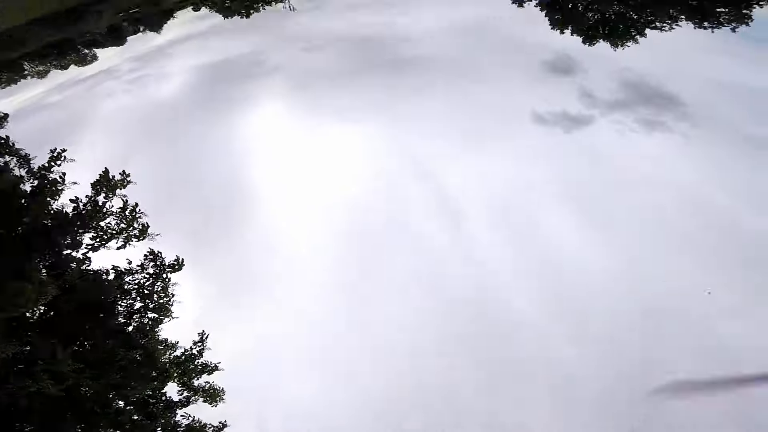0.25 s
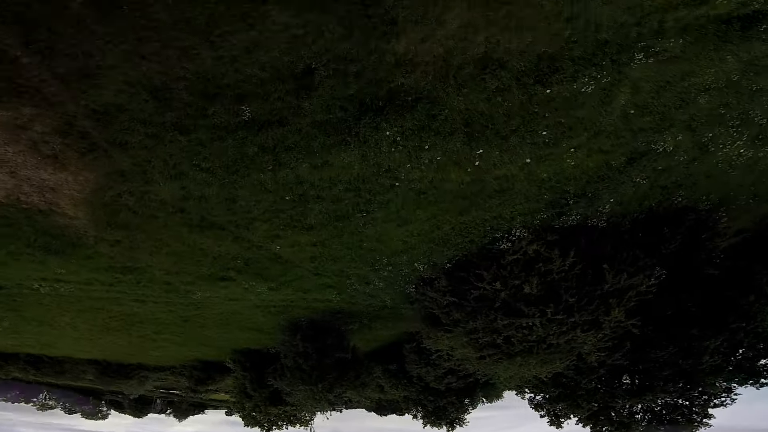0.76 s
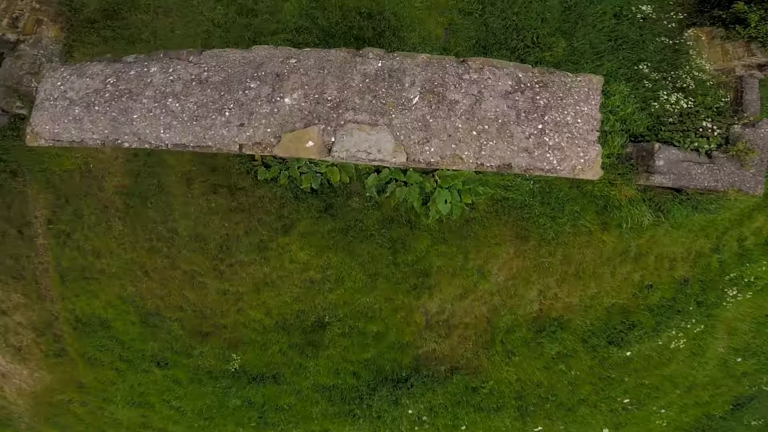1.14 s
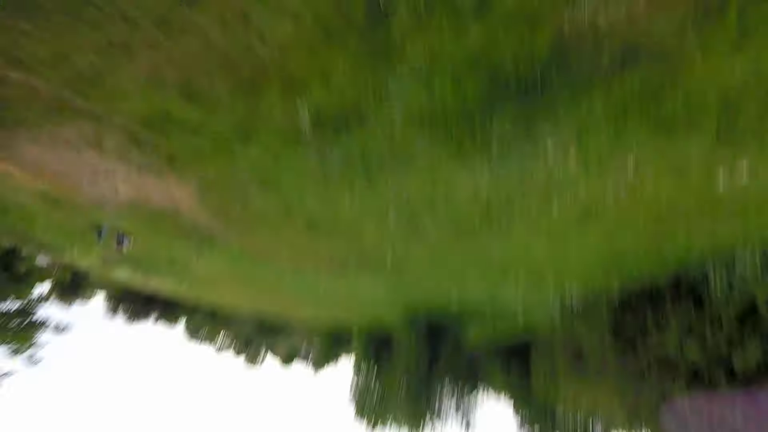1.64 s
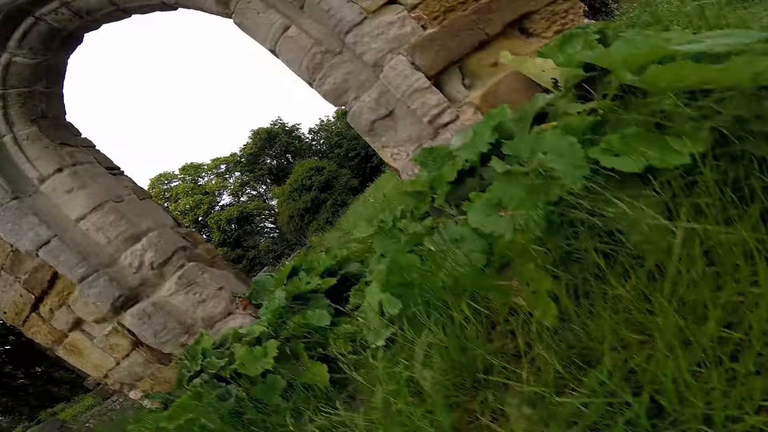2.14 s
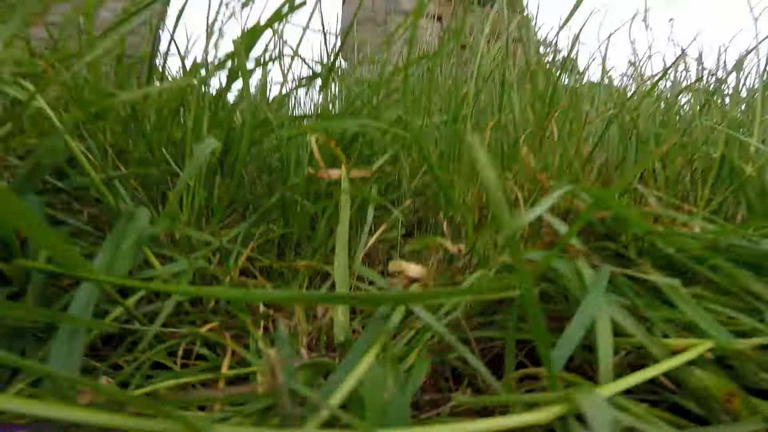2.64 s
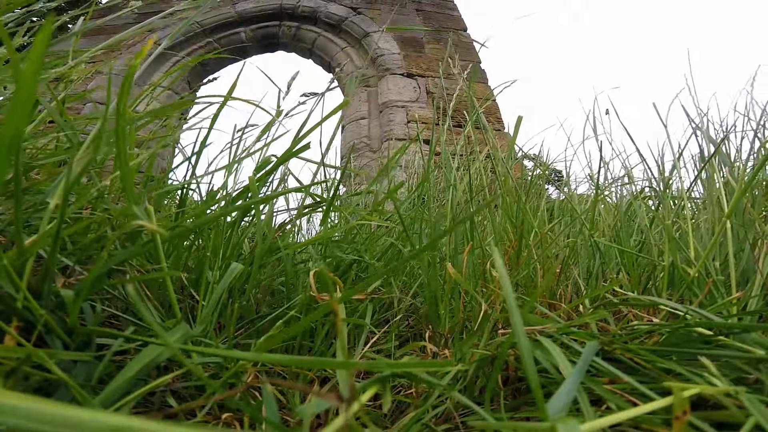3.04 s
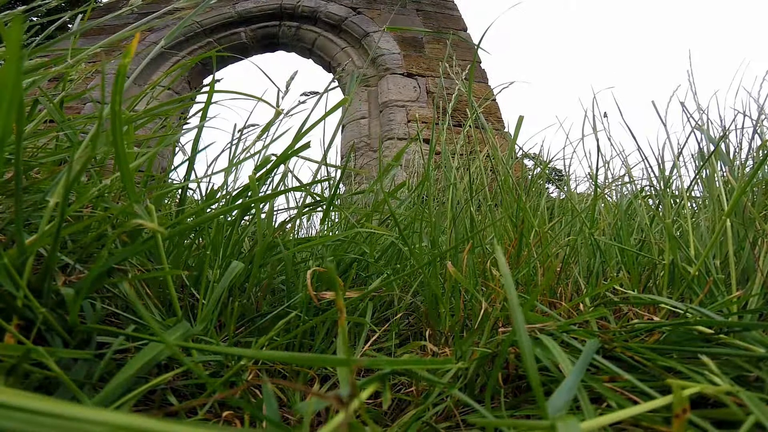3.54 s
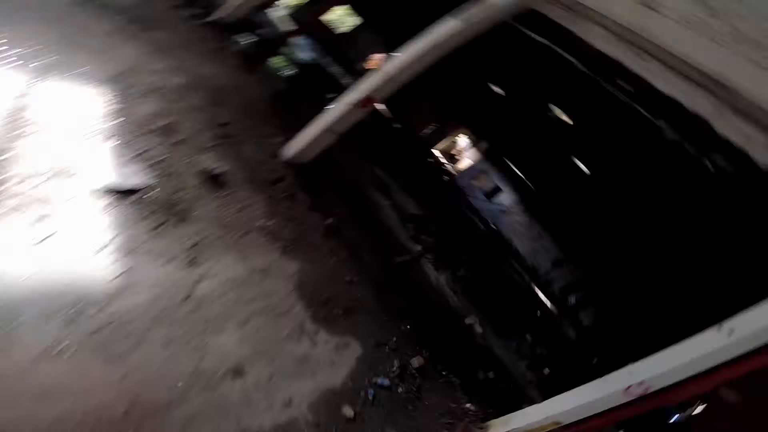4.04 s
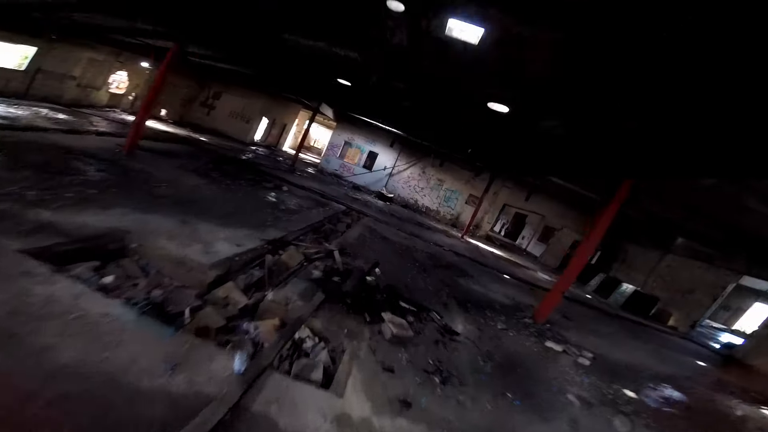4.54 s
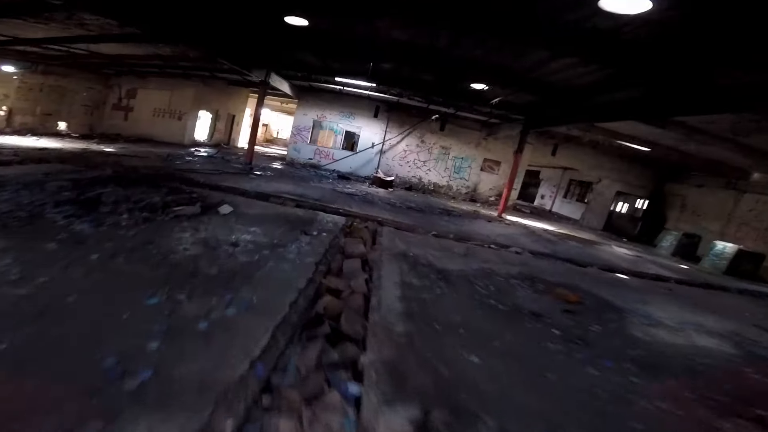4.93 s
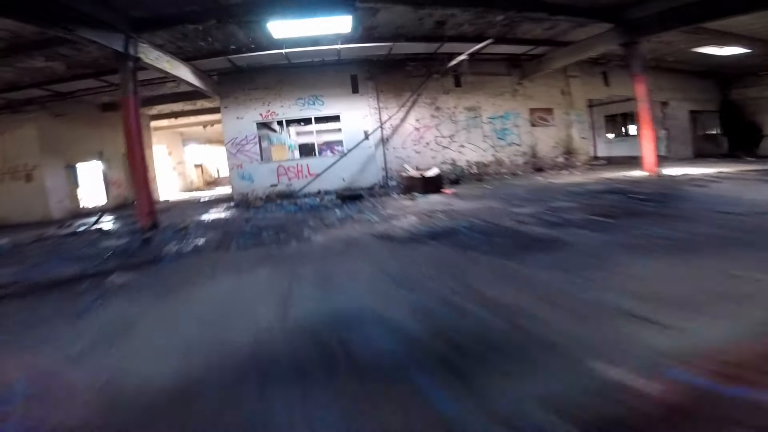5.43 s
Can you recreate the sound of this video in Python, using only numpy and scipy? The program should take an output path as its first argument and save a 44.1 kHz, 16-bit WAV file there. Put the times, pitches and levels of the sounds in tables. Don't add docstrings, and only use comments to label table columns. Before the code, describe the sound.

On-board microphone on a small racing drone: wind rumbles and idling motors whine thinly as it falls, then rotors scream in a flip. It scrapes and knocks hard on a stone wall, spins up briefly, thuds into grass with blade clicks, and falls almost silent. A hard cut brings rough rotor bursts and buffeting, then a steady wavering drone through an empty hall.

```python
import sys
import numpy as np
from scipy import signal
from scipy.io import wavfile
from scipy.ndimage import uniform_filter1d

SR = 44100
rng = np.random.default_rng(int(sys.argv[2]) if len(sys.argv) > 2 else 0)


def decibels_to_gain(level_db):
    exponent = np.asarray(level_db, float) / 20
    return 10 ** exponent


def dump(signal):
    limited = np.clip(np.atleast_2d(signal).T, -1, 1)
    pcm = np.round(limited * 32767).astype(np.int16)
    wavfile.write(sys.argv[1], SR, pcm)


N = 250488
SCENE_CHANGE_S, GRASS_S = 3.611, 2.24

# time_s, shaft_hz
FLIP = [
    [(.62, 224), (.66, 300), (.7, 440), (.74, 477), (.8, 435), (.87, 405), (.94, 320), (1.0, 275)],
    [(.64, 265.4), (.71, 341.3), (.77, 350), (.82, 374), (.87, 289.2), (.96, 235), (1.08, 238),
     (1.16, 257.6)],
    [(1.165, 108), (1.185, 138), (1.21, 156), (1.235, 150), (1.25, 130)],
    [(1.292, 150), (1.318, 234), (1.333, 224), (1.352, 160), (1.364, 145)],
]
# time_s, shaft_hz
RESCUE = [
    [(1.665, 129), (1.69, 229), (1.73, 330), (1.765, 387.8), (1.81, 426), (1.83, 302), (1.85, 193.4),
     (1.9, 150), (2.06, 72)],
    [(1.67, 136.7), (1.7, 275), (1.725, 300.4), (1.765, 263.3), (1.81, 187)],
    [(1.74, 298.8), (1.81, 355)],
    [(2.33, 165), (2.346, 208), (2.362, 185), (2.376, 150)],
]
# time_s, shaft_hz
TURN = [
    [(3.61, 243.1), (3.66, 267.5), (3.735, 277), (3.745, 254), (3.768, 170)],
    [(3.61, 245.7), (3.66, 298.8), (3.72, 310.8), (3.755, 293), (3.77, 240)],
    [(3.762, 200.5), (3.788, 345), (3.81, 235), (3.835, 178.3), (3.86, 135.6)],
    [(4.0, 142.7), (4.015, 205.4), (4.035, 240), (4.07, 137.7), (4.095, 119)],
]
# time_s, shaft_hz
FAST_PAIR = [(4.15, 171.4), (4.258, 184.4), (4.382, 191.4), (4.48, 226.4), (4.55, 225), (4.64, 203),
             (4.722, 191.4), (4.8, 203), (4.875, 207), (4.925, 198), (5.0, 167.6), (5.101, 170.8),
             (5.22, 198), (5.33, 230), (5.45, 233), (5.569, 245), (5.68, 238.3)]
# time_s, shaft_hz
SLOW_PAIR = [(4.09, 119.2), (4.23, 147.1), (4.319, 139.7), (4.47, 190), (4.55, 191), (4.7, 164), (4.8, 177),
             (4.9, 178), (5.03, 144), (5.12, 153), (5.32, 203), (5.46, 207), (5.56, 216), (5.68, 203)]
# time_s, shaft_hz
STRAYS = [
    [(5.2, 167.5), (5.3, 187.8), (5.45, 189.1), (5.56, 203), (5.68, 195)],
    [(0, 169), (.05, 132.6)],
    [(.44, 165), (.52, 228), (.545, 140), (.62, 215), (.65, 200)],
    [(3.86, 273.3), (3.9, 252), (3.945, 254.6), (4.0, 214)],
    [(1.225, 160), (1.245, 168), (1.275, 162), (1.3, 135)],
    [(1.362, 140), (1.38, 200), (1.393, 218), (1.407, 120)],
    [(.82, 198), (.89, 208), (.93, 190), (.99, 196)],
]
BURSTS = FLIP + RESCUE + TURN + [FAST_PAIR, SLOW_PAIR] + STRAYS
# shaft_db, blade_pass_db, second_blade_harmonic_db
TONES = [(-16, -36, -56), (-21, -35, -44), (-16, -15, -25), (-13, -15, -18), (-26, -26, -37),
         (-36, -22, -33), (-30, -28, -47), (-22, -16, -34), (-14, -15, -26), (-13, -21, -36),
         (-12, -18, -25), (-14, -21, -26), (-12.5, -20, -38), (-29, -20, -30), (-21, -21, -33),
         (-21, -23, -36), (-18, -42, -55), (-15, -34, -48), (-18, -13, -32), (-10, -20, -25),
         (-45, -31, -52)]
BLADE_ROLL_DB = [-10, -10, -6, -13, -4, -7, -7, -12, -7, -10, -12, -18, -12, -12, -16, -5, -12, -12, -12,
                 -9, -12]
ROUGHNESS = [1.8, 2, 2.2, 1.5, 1, 1.5, 1.5, 3.5, 1.2, 1.5, 1.8, 3, .55, .6, .7, 2, 1.8, 2.5, 2, 2.5, 2.5]
# shaft, blade_pass, second_harmonic (dB per octave)
GROWTH = [
    [11, 7.8, 14],
    [3.9, 5.3, 12],
]
TWICE_SHAFT_DB = [-16, -28]
# pitch_hz, width_octaves, gain_db
ARM_PEAK = (197.7, 0.12, 6.2)
# time_s, blade_pass_change_db
NOSE_DOWN = [(4.1, -1), (4.4, 0), (4.5, -3), (4.6, 0), (4.7, 3), (4.9, 4), (5.05, 2), (5.25, -1), (5.68, 0)]

# time_s, whine_hz
HUNTING = [
    [(.05, 7000), (.16, 4200), (.23, 3650), (.29, 4300), (.35, 3500), (.42, 3550), (.475, 4400),
     (.565, 3800), (.63, 6400)],
    [(.06, 5400), (.1, 4000), (.15, 4700), (.18, 4050), (.22, 4200), (.29, 3300), (.39, 3300), (.44, 3900),
     (.53, 6900)],
]
# start_s, length_s, from_hz, to_hz, level_db
GLIDES = [ (.07, .09, 6360, 3680, -58), (.44, .075, 4300, 6860, -64), (.5, .165, 3300, 6700, -52),
          (.41, .2, 7380, 7420, -58), (.86, .09, 5480, 4630, -50), (.93, .08, 5300, 4360, -51),
          (1.05, .13, 4300, 5000, -52), (.96, .07, 7500, 7400, -39), (1.49, .155, 4220, 2880, -69),
          (1.515, .06, 4400, 3050, -67), (1.655, .03, 2600, 7000, -54), (1.9, .09, 5000, 6700, -80),
          (1.985, .13, 6730, 3400, -76), (2.02, .12, 6700, 3450, -79), (2.045, .055, 5600, 3700, -73),
          (2.1, .09, 3150, 3500, -80), (2.15, .045, 7200, 7450, -76), (3.83, .035, 6000, 4600, -54),
          (3.87, .11, 5900, 3400, -66), (3.89, .05, 5350, 5200, -63), (3.935, .06, 5200, 4000, -63),
          (3.995, .03, 4200, 8200, -47), (4.05, .06, 5300, 5070, -59), (5.0, .08, 8300, 8000, -58), ]

# start_s, peak_db, bright_db, pitch_hz
STRIKES = [(1.188, -9, -21, 800), (1.228, -9, -16, 1200), (1.25, -12, -18, 1500), (1.272, -10, -18, 900),
           (1.299, -8, -23, 700), (1.368, -6, -17, 600), (1.396, -2, -27, 850), (1.401, -6, -30, 500),
           (1.417, -10, -26, 800), (1.435, -14, -21, 600), (1.445, -14, -24, 600), (1.468, -12, -25, 800),
           (1.645, -33, -12, 900), (2.195, -28, -20, 1000), (2.216, -28, -16, 1200), (2.248, -18, -24, 600),
           (2.264, -12, -19, 700), (2.284, -5, -33, 900), (2.317, -11, -32, 500), (2.343, -12, -32, 700),
           (2.356, -10, -18, 600), (2.371, -16, -35, 480), (2.379, -16, -35, 450), (2.468, -48, -26, 700),
           (3.81, -14, -22, 900), (4.021, -13, -20, 1400), (4.032, -16, -20, 1200)]
# start_s, peak_db, bright_db
BLOWS = [(1.297, 2, -31.5), (1.366, -2, -18), (1.399, 1.5, -32), (1.466, -3.5, -26), (2.107, -31.5, -21),
         (2.196, -25, -26.5), (2.214, -21.5, -17.5), (2.249, -15, -14), (2.262, 1, -23), (2.284, -4, -55),
         (2.63, -42, -24)]
# pitch_hz, level_db, time_to_fall_60_db_s
FRAME_MODES = [(61.3, -17, 0.065), (160, 7, 0.026), (330, 3, 0.013), (515, 14.5, 0.0083)]
# start_s, length_s,
# level_db, low_hz, high_hz
BRUSHES = [(0.0, 0.08, -45, 1900, 4300), (1.185, 0.033, -29.5, 600, 5600), (1.228, .03, -28, 803, 4500),
           (1.415, .012, -24, 400, 2300), (1.0, 0.16, -28, 450, 640), (3.612, .02, -27, 600, 1740),
           (1.256, 0.037, -23, 410, 3200), (1.35, 0.026, -24.5, 460, 5114), (1.425, 0.073, -16, 249, 650),
           (2.195, 0.13, -56, 5000, 10000), (2.245, .13, -40, 5000, 7300), (2.263, .05, -41, 5000, 10500),
           (2.25, .13, -45, 8000, 13500), (2.25, .13, -19, 170, 470), (1.7, .12, -54, 8000, 12500),
           (0, .06, -45, 1900, 2300), (.02, .05, -47, 2900, 3300), (.03, .04, -49, 4200, 4700),
           (4.018, .03, -32, 900, 4000), (4.84, .16, -27, 740, 860), (1.37, .035, -20, 400, 1500),
           (4.05, .2, -30, 300, 420), (2.347, 0.027, -26.5, 250, 1930), (2.283, .025, -23, 500, 2000),
           (2.1, 0.41, -56, 470, 1400), (2.4, 1.24, -86, 5500, 10970), (2.63, 0.15, -49, 69.7, 390),
           (2.63, 0.008, -59, 300, 1900), (1.4627, 0.022, -23, 300, 1730), (2.626, .12, -71, 5480, 10500),
           (2.77, .045, -72.5, 5580, 10300), (2.802, .14, -65.5, 60, 604), (3.0, .6, -64, 21.93, 92.9),
           (4.157, .02, -39.5, 4500, 7500)]

# time_s, level_db
AIRSPEED = [(0, -17), (.108, -24), (.49, -22.5), (.52, -15.5), (1.33, -15), (1.4, -13.5), (1.46, -20),
            (1.52, -34), (1.65, -36.5), (1.714, -18.5), (2.19, -36.5), (2.28, -7), (2.42, -34.5),
            (2.56, -59.5), (3.1, -80.5), (3.59, -60), (3.62, -17.5), (5.68, -16)]
# time_s, level_db
THROTTLE = [(.08, -61), (.236, -67), (.45, -59), (.694, -36), (1.14, -39), (1.42, -32), (1.455, -78),
            (1.52, -78), (1.93, -90), (2.12, -85.5), (3.59, -94.5), (3.62, -57), (3.94, -63.5), (4.1, -55),
            (4.17, -45.5), (4.476, -36), (4.92, -42), (5.68, -34.5)]
# top_reached_s, rise_s, hold_s, top_db, fall_db_per_s
PUNCHES = [(0, 0.013, 0.0078, -44, 454), (1.159, 0.0093, 0.09, -31.5, 300),
           (1.364, 0.16, 0.012, -29.5, 300), (1.456, 0.0039, 0.0023, -33.5, 799.5),
           (1.648, 0.0063, 0.042, -49.5, 96.5), (1.732, 0.051, 0.018, -37.5, 171),
           (2.2, 0.018, 0.049, -59.5, 301.5), (2.264, 0.04, .1, -43, 700),
           (3.614, 0.0044, 0.12, -35.5, 444), (3.778, 0.033, 0.004, -29, 360),
           (4.009, 0.022, 0.006, -31, 369)]
# from_s, wash_change_db
STOPPED = (2.39, -16)
# pitch_hz, level_db_per_hz
FIELD = [(760, -29), (1300, -4), (1480, 5), (1960, 3), (3430, -9.5), (5740, -14.5), (6770, -21.5),
         (7420, 5), (7980, -18), (9070, -19.5), (11600, -45.5), (15100, -87.5), (22000, -120)]
# pitch_hz, level_db_per_hz
HALL = [(760, -30), (1300, -11.5), (1550, -10), (4820, -19), (7080, -12), (8050, -26.5), (11600, -68),
        (15100, -91.5), (22000, -120)]
# pitch_hz, level_db_per_hz
RUMBLE = [(150, 3), (300, -15.5), (600, -8), (900, -16), (1300, -20.5)]
# wash_db, hiss_db
SCALE_DB = [(-30.5, -24.5), (-27, -24)]
# pitch_hz, width_hz, level_db
PORT = (7400, 380, -9.5)


def at_hz(points, hz):
    table_hz, level_db = np.transpose(points)
    return np.interp(np.log(hz), np.log(table_hz), level_db)


def rms_one(x):
    return x / np.sqrt(np.mean(x ** 2) + 1e-20)


def drift(rate):
    r = np.exp(-40 * np.pi * rate / SR)
    noise = rng.standard_normal(N // 20 + 2002)
    slow = signal.lfilter([1], [1, -2 * r, r * r], noise)[2000:]
    return np.interp(np.arange(N) / 20, np.arange(len(slow)), rms_one(slow))


def band_filter(x, order, low_hz, high_hz):
    return signal.sosfilt(signal.butter(order, [low_hz, high_hz], "band", fs=SR, output="sos"), x)


def band(low_hz, high_hz):
    return rms_one(band_filter(rng.standard_normal(N), 2, low_hz, high_hz))


def track(rows, fade_s):
    s, *columns = np.transpose(rows)
    span = np.arange(int(s[0] * SR), min(int(s[-1] * SR), N))
    t = span / SR
    to_end = s[-1] - t + (s[-1] * SR > N - 50)
    fade = np.clip(np.minimum(t - s[0], to_end) / fade_s, 0, 1)
    smooth = [uniform_filter1d(np.interp(t, s, c), size=600, mode="nearest") for c in columns]
    return span, fade, smooth


def loaded_rotors():
    out = np.zeros(N)
    hunt, tear = drift(30), drift(90)
    flutter = [drift(35) for _ in range(4)]
    peak_hz, peak_octaves, peak_gain_db = ARM_PEAK
    for k, rows in enumerate(BURSTS):
        span, fade, (shaft_hz,) = track(rows, 0.0038)
        indoors = int(rows[-1][0] > SCENE_CHANGE_S)
        rough = ROUGHNESS[k]
        octaves = np.log2(shaft_hz / shaft_hz.max())
        shaft_db, blade_db, second_db = np.array(TONES[k])[:, None] + np.outer(GROWTH[indoors], octaves)
        off_peak = np.log2(shaft_hz / peak_hz) / peak_octaves
        shaft_db = shaft_db + peak_gain_db * np.exp(-off_peak ** 2)
        load_sign = (rows is FAST_PAIR) - (rows is SLOW_PAIR)
        blade_db = blade_db + load_sign * np.interp(span / SR, *np.transpose(NOSE_DOWN))

        shaken_hz = shaft_hz * (1 + .007 * rough * np.roll(hunt, k * 7001)[span])
        turn = 2 * np.pi * np.cumsum(shaken_hz) / SR
        orders = [(1, shaft_db), (2, shaft_db + TWICE_SHAFT_DB[indoors]), (3, blade_db), (6, second_db)]
        orders += [(3 * n, second_db + BLADE_ROLL_DB[k] * (n - 2)) for n in range(3, 7)]
        for j, (order, level_db) in enumerate(orders):
            shake_db = (1.6 + .15 * j) * np.clip(rough, .9, 2.2)
            shake_db = shake_db * np.roll(flutter[j % 4], (k + 3 * j) * 9001)[span]
            tear_db = 2.2 * np.clip(rough - .8, 0, 2) * np.roll(tear, (k + 5 * j) * 4001)[span]
            level = decibels_to_gain(level_db + shake_db + tear_db)
            out[span] += np.sqrt(2) * fade * level * np.sin(order * turn + j + k)
    return out


def idling_motors(wind_db):
    out, flutter, share = np.zeros(N), drift(42), np.linspace(0, 1, 8)
    motors = [(rows, -57) for rows in HUNTING]
    for s, length_s, from_hz, to_hz, db in GLIDES:
        done = share ** 2.1 if to_hz > from_hz else 1 - (1 - share) ** 2.1
        motors.append((np.c_[s + length_s * share, from_hz + (to_hz - from_hz) * done], db))
    for k, (rows, db) in enumerate(motors):
        span, fade, (whine_hz,) = track(rows, .012)
        steps = 2 * np.pi * np.cumsum(whine_hz) / SR
        speeding_up = np.clip(np.gradient(whine_hz) * SR / 30000, 0, 1)
        whine = decibels_to_gain(db + 5 * speeding_up) * np.sin(steps)
        idle_db = 0.5 if rows[0][0] > SCENE_CHANGE_S else -5
        shaft = decibels_to_gain(idle_db + 1.344 * wind_db[span]) * np.sin(steps / 21)
        level = decibels_to_gain(4.5 * np.roll(flutter, k * 5003)[span])
        out[span] += np.sqrt(2) * fade * level * (whine + shaft)
    return out


def strikes():
    out, t = np.zeros(N), np.arange(int(.06 * SR)) / SR
    spit = rms_one(signal.lfilter([.3], [1, -.7], band(1000, 7000)))
    rise = np.sin(np.pi / 2 * np.minimum(t / .0015, 1)) ** 2
    for s, peak_db, bright_db, hz in STRIKES:
        at = int(s * SR)
        ring = np.zeros(len(t))
        for n, ratio in enumerate([1, 1.7, 2.6]):
            mode_hz = hz * ratio
            ring += decibels_to_gain(-7 * n - 60 * t * mode_hz / 8) * np.sin(2 * np.pi * mode_hz * t)
        spat = decibels_to_gain(bright_db - 1 - 60 * t / .035) * spit[at:at + len(t)]
        out[at:at + len(t)] += decibels_to_gain(peak_db + 3) * rise * (ring + spat)
    return out


def blows():
    out, t = np.zeros(N), np.arange(int(.2 * SR)) / SR
    crack = rms_one(signal.lfilter([.3], [1, -.7], band(900, 8000)))
    strengths_db = rng.normal(0, 0.79, (len(BLOWS), len(FRAME_MODES)))
    for (s, peak_db, bright_db), each_db in zip(BLOWS, strengths_db):
        at = int(s * SR)
        body = np.zeros(len(t))
        for (hz, db, ring_s), own_db in zip(FRAME_MODES, each_db):
            body += decibels_to_gain(db + own_db - 60 * t / ring_s) * np.sin(2 * np.pi * hz * t)
        snap = decibels_to_gain(peak_db + bright_db - 12 - 60 * t / 0.0388) * crack[at:at + len(t)]
        out[at:at + len(t)] += decibels_to_gain(peak_db - 6.5) * np.minimum(t / 0.0042, 1) * body + snap
    return out


def brushes():
    out = np.zeros(N)
    sizes = decibels_to_gain(3.5 * np.minimum(rng.exponential(1, N), 4)) * rng.choice([-1, 1], N)
    chance = rng.random(N)
    for s, length_s, db, low_hz, high_hz in BRUSHES:
        span, fade, (level_db,) = track([(s, db), (s + length_s, db - 9)], .003)
        grains_per_s = 1000 + 0.34 * high_hz
        grains = sizes[span] * (chance[span] < grains_per_s / SR) + 1e-18
        out[span] += decibels_to_gain(level_db) * fade * rms_one(band_filter(grains, 4, low_hz, high_hz))
    return out


def in_time(table):
    t = np.arange(N) / SR
    before, after = np.minimum(t, SCENE_CHANGE_S - .025), np.maximum(t, SCENE_CHANGE_S + .03)
    return np.interp(np.where(t < SCENE_CHANGE_S, before, after), *np.transpose(table))


def punch(s, rise_s, hold_s, top_db, fall_db_per_s):
    t = np.arange(N) / SR - s
    rise_db = np.maximum(-t * 25.5 / max(rise_s, .001), 0)
    return top_db - rise_db - fall_db_per_s * np.maximum(t - hold_s, 0)


def controls():
    t = np.arange(N) / SR
    indoors = t > SCENE_CHANGE_S
    hiss_db = np.max([in_time(THROTTLE)] + [punch(*row) for row in PUNCHES], axis=0)
    wind_db = in_time(AIRSPEED)
    wash_db = np.where(indoors, -16, -12.5) + np.where(indoors, 0.38, 0.7) * hiss_db
    stop_s, stop_db = STOPPED
    wash_db = wash_db + stop_db * ((t > stop_s) & (t < SCENE_CHANGE_S))
    rumble_db = -0.5 + .55 * wind_db + 0.36 * wash_db
    return wind_db, rumble_db, wash_db, hiss_db


def coloured(edges, colour_db, patchy_db):
    out, together = np.zeros(N), drift(28)
    for low_hz, high_hz in zip(edges, edges[1:]):
        flicker_db = patchy_db * (0.34 * together + drift(18))
        level = np.sqrt(high_hz - low_hz) * decibels_to_gain(colour_db(np.sqrt(low_hz * high_hz)) + flicker_db)
        out += band(low_hz, high_hz) * level
    return out


def resonance(x, hz, width_hz):
    r = np.exp(-np.pi * width_hz / SR)
    poles = [1, -2 * r * np.cos(2 * np.pi * hz / SR), r * r]
    return signal.lfilter(np.array([1, 0, -1]) * (1 - r * r) / 2, poles, x)


def port_whistle(hiss_db):
    hz, width_hz, port_db = PORT
    whistle = resonance(rng.standard_normal(N), hz, width_hz)
    whistle = rms_one(resonance(whistle, hz, width_hz))
    return decibels_to_gain(hiss_db + port_db + 4 * drift(16)) * whistle * (np.arange(N) / SR < GRASS_S)


def air_noise(wind_db, rumble_db, wash_db, hiss_db):
    indoors = np.arange(N) / SR > SCENE_CHANGE_S
    wash_db = wash_db + np.where(indoors, SCALE_DB[1][0], SCALE_DB[0][0])
    tip_db = hiss_db + np.where(indoors, SCALE_DB[1][1], SCALE_DB[0][1])

    def colour_db(hz):
        tip_share = np.clip(np.log(hz / 2200) / np.log(5500 / 2200), 0, 1)
        place_db = np.where(indoors, at_hz(HALL, hz), at_hz(FIELD, hz))
        return place_db + (1 - tip_share) * wash_db + tip_share * tip_db

    wind = rms_one(band(38, 160) * decibels_to_gain(2.5 * drift(20)))
    rumble = rms_one(coloured(np.geomspace(140, 1400, 8), lambda hz: at_hz(RUMBLE, hz), patchy_db=3))
    rotors = coloured(np.geomspace(1300, 15200, 15), colour_db, patchy_db=1.56)
    return decibels_to_gain(wind_db) * wind + decibels_to_gain(rumble_db) * rumble + rotors + port_whistle(hiss_db)


def scene():
    levels = controls()
    drone = loaded_rotors() + idling_motors(levels[0])
    drone = drone + strikes() + blows() + brushes() + air_noise(*levels)
    dull = signal.sosfilt(signal.butter(6, 10500, fs=SR, output="sos"), drone)
    return np.where(np.arange(N) / SR > SCENE_CHANGE_S, dull, drone)[None, :]


def band_limit(x):
    return signal.sosfilt(signal.butter(12, 15200, fs=SR, output="sos"), x)


def record(dry):
    rounded = dry / (1 + np.abs(dry / .97) ** 4) ** .25
    return band_limit(rounded)


dry = scene()
out = record(dry)
dump(out)
```